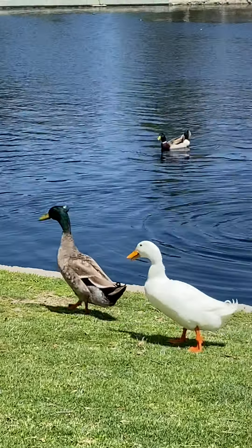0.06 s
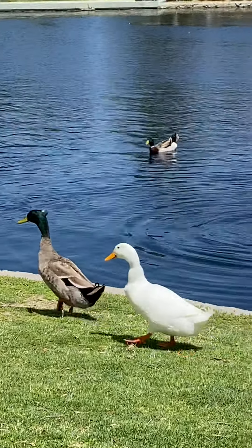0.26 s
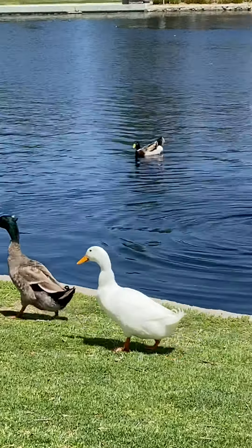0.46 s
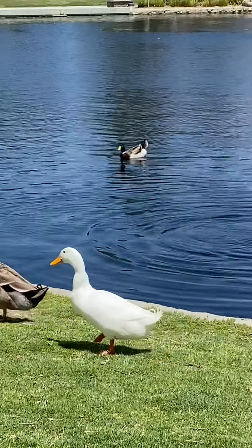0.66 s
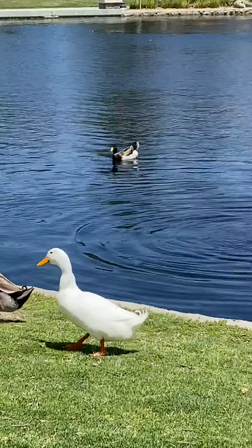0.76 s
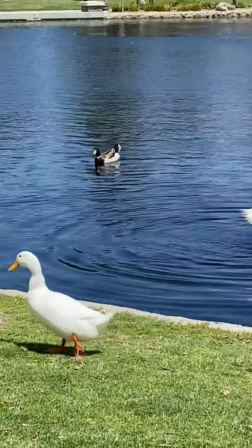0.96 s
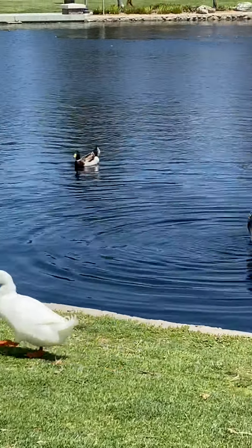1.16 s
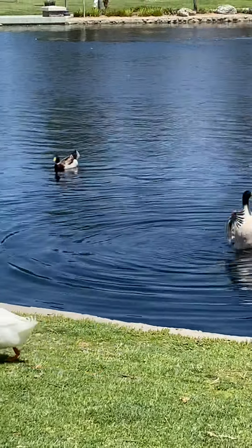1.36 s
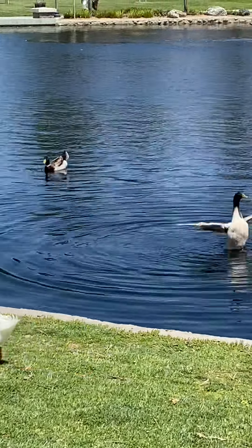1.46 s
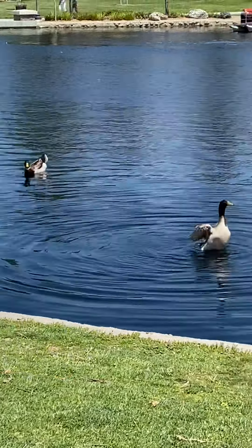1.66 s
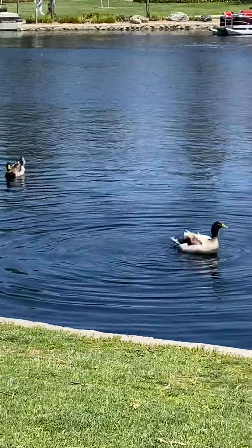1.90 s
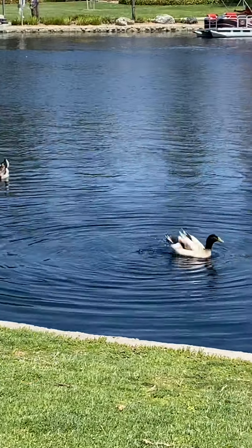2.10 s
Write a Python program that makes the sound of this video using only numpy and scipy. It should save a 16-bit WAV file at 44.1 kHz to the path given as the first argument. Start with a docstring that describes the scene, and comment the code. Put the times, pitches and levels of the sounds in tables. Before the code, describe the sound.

Short raspy duck quacks come scattered over a steady soft park hiss; around one second another duck starts beating its wings, growing to wet slaps and rattling feathers, while breeze rumbles on a close stereo microphone.

```python
"""Ducks on a breezy pond

A drake's short raspy quacks are pulse trains ringing throat resonances, with one faint echo.
Another duck beats its wings on the water: swells of noise, feather rattle and slaps, snaps, churned wash.
Behind them lies a steady park hiss. These pass through two close ports with level and phase offsets.
A light breeze rumbles, buffets and knocks on the ports directly."""
import sys
import numpy as np
from scipy import signal
from scipy.fft import rfft, irfft, next_fast_len
from scipy.io import wavfile
from scipy.ndimage import uniform_filter1d

SR = 44100
rng = np.random.default_rng(int(sys.argv[2]) if len(sys.argv) > 2 else 0)


def master(y):
    """Save y as 16-bit WAV."""
    cut = np.clip(np.atleast_2d(y).T, -1, 1)
    pcm = np.round(cut * 32767)  # scale
    wavfile.write(sys.argv[1], SR, pcm.astype(np.int16))


N = 94153
SIZE = next_fast_len(N + 4096)  # FFT length, padded so filter tails do not wrap

# quacks: [start t/s, length/s, level/dB, mid-call throat f/Hz, strong pulses per s,
#   mid-call tilt/dB per octave, tilt change start to end/dB per octave,
#   side resonances/dB, throat glide start to end/share]
QUACKS = [(0.029, 0.089, -46.5, 1877, 96, -2, -14, -0.5, 0.096),
          (0.529, 0.038, -51.5, 2217, 70, -16, 0, -7, .03),
          (0.556, 0.077, -49.5, 1806, 94, -6, 15, 2.5, 0.11),
          (0.77, 0.1, -50, 1840, 74, -2, -20, 2, -0.1555), (1.279, 0.07, -49, 1820, 67, -14, -20, 1, -.1),
          (1.493, 0.084, -45, 1853, 77, 4.5, 6, -1.5, .14), (1.783, 0.03, -51, 1750, 70, -3, -13, 2, -.05),
          (1.866, 0.054, -56, 1810, 68, -2, 13, -7, 0.06), (1.928, 0.088, -52.5, 1770, 73, -14, 18, 0, .1)]
# throat resonances: [f/share of the throat centre, width of one pass/Hz, relative level/dB]
THROAT = [(.82, 163, -1), (1.0, 95, 4), (1.2, 105, 1.5), (1.45, 114, -7), (2.9, 510, -15)]
# wing beats: [peak t/s, relative whoosh level/dB, relative rattle level/dB, relative slap level/dB,
#   breadth of the rise/s]
BEATS = [(0.987, -55, -73, -67, 0.028), (1.064, -57, -83, -71, 0.014), (1.163, -49, -79, -67, 0.033),
         (1.246, -54, -79, -71, 0.067), (1.34, -55, -74, -66, 0.027), (1.447, -47, -59, -55, 0.032),
         (1.675, -53, -60, -69, 0.023), (1.763, -45.5, -50.5, -50.5, 0.036),
         (1.864, -47, -58.5, -54.5, 0.031), (1.951, -62, -77, -75, 0.038)]
# dull whoosh of pushed air: [f/Hz, relative level/dB per Hz]
WHOOSH_COLOUR = [(150, -26), (350, 7), (700, 2), (1100, 2), (2200, -43), (8000, -68)]
# brighter swish that follows it: [f/Hz, relative level/dB per Hz]
SWISH_COLOUR = [(400, -1.5), (900, 1), (1400, 3), (2200, -15), (3500, -12), (9000, -45)]
# snaps of water and feathers: [t/s, peak level/dB, f/Hz]
DROPS = [(1.2114, -40.5, 3200), (1.447, -43, 1370), (1.4547, -38, 1400), (1.766, -33, 1300),
         (1.87, -35.5, 1530)]
# churned water round the flapping bird: [t/s, level/dB]
CHURN_LEVEL = [(0, -57), (.3, -58), (.8, -64.5), (1.15, -61), (1.5, -56), (1.9, -54), (2.13, -57.5)]
# colour of the churn: [f/Hz, relative level/dB per Hz]
CHURN_COLOUR = [(150, -4.5), (400, -4), (800, 3.5), (1600, 2), (3000, 0), (6000, -38)]
# breeze, gust by gust: [t/s, rumble level/dB, relative buffeting level/dB,
#   relative level of the part differing between ports/dB]
BREEZE = [
    [(0.0, -45, -73, -56), (0.048, -52, -82, -70), (0.09, -64, -44, -53), (0.158, -43, -51.5, -68),
     (0.188, -56, -62, -55), (0.262, -49.5, -53.5, -74), (0.49, -61, -60.5, -63.5),
     (0.596, -48.5, -61, -77), (0.676, -54.5, -53, -66), (0.704, -46, -74, -72), (0.73, -59, -49, -65),
     (0.788, -46.5, -62, -60), (0.858, -65, -52.5, -75), (0.886, -44, -79, -54), (0.98, -50, -50, -53)],
    [(0.99, -60, -57, -62), (1.014, -51.5, -52, -62), (1.046, -43, -44, -62), (1.094, -46.5, -51.5, -63),
     (1.264, -40, -49.5, -61), (1.284, -51, -62, -68), (1.308, -40.5, -48, -52), (1.344, -42, -55.5, -59),
     (1.4, -45, -46, -47), (1.472, -39, -50.5, -57), (1.496, -63, -48.5, -65), (1.516, -45, -48.5, -61),
     (1.58, -59, -52.5, -70), (1.6, -45, -56, -71), (1.652, -43, -46, -60)],
    [(1.664, -46, -33.5, -54), (1.682, -30, -40, -57), (1.706, -48.5, -44.5, -63), (1.734, -39, -44.5, -61),
     (1.768, -36.5, -53, -64), (1.804, -50.5, -51.5, -62), (1.858, -53, -45.5, -67),
     (1.914, -38.5, -50, -59), (1.936, -50, -66, -60), (1.964, -31, -54.5, -51), (1.986, -50, -54, -54),
     (2.02, -50, -58.5, -44), (2.04, -64, -55, -49), (2.106, -51, -53, -56), (2.13, -63, -42, -66)],
]
# colours of rumble, buffeting and the differing part: [f/Hz, relative level/dB per Hz]
RUMBLE_COLOUR = [(20, -45), (32, -12), (50, 1), (80, 4.5), (120, -7.5), (170, -17.5), (300, -59),
                 (3000, -100)]
BUFFET_COLOUR = [(60, -38), (110, 1.5), (160, 0), (240, -2.5), (330, -15.5), (500, -39), (1000, -59),
                 (5000, -100)]
APART_COLOUR = [(30, -30), (60, -12), (100, -3), (150, 0), (250, -4), (400, -15), (1000, -45), (5000, -100)]
# sudden knocks of air on the ports: [t/s, level/dB, f midway through the sag/Hz, ring/s]
KNOCKS = [(1.036, -38.5, 165, 0.031), (1.6618, -34, 197, 0.022), (1.664, -35, 82.2, .034),
          (1.906, -39.5, 100, .02)]
# far hiss of park and water: [f/Hz, relative level/dB per Hz]
PARK_COLOUR = [(20, -60), (40, -30), (100, 1.5), (300, 1.5), (500, -1.5), (1000, -1), (1500, -4),
               (2000, -6.5), (3000, -9), (4000, -11), (5500, -11), (7000, -13.5), (9500, -15),
               (12000, -22.5), (16000, -26.5)]
# share of the hiss reaching each port separately: [f/Hz, level/dB]
DIFFUSE = [(60, -22), (300, -8), (700, -6), (1500, -7), (2500, -9), (3500, -13), (6000, -9), (16000, -10)]
# between the ports: [f/Hz, left minus right level/dB]
PORT_BALANCE = [(60, 0), (200, -1), (330, -3), (500, -5), (770, -7), (1170, -7), (1650, -3), (2000, 0),
                (2500, 2), (3100, 0), (15000, 0)]
# between the ports: [f/Hz, lead of the left phase/rad]
PORT_PHASE = [(20, 0), (1120, -.5), (2000, 0), (4200, .2), (5200, .5), (6000, 1.7), (6900, 2.9),
              (8000, 3.5), (9900, 5.9), (11600, 6.7), (12600, 9.0), (14500, 9.8), (16000, 12)]

# quacks
PULSE_JITTER, HALF_PULSE_DB = 0.1, -5.5  # spread as share of the gap; weak against strong pulse
BREATH_SHARE, BREATH_S = 0.6, 0.006  # strength and decay of the puff after each pulse
COLOUR_SWING_DB = 2.5  # random resonance level, pulse by pulse
BILL_OPEN_DB = 11  # brightening from either end to mid-call, dB per octave
QUACK_RISE, QUACK_FALL, QUACK_START = 0.45, 0.25, 0.18  # shares of length, gain at the start
ECHO_S, ECHO_DB = 0.003105, -13.5
# wings
BEAT_FALL_SHARE = 0.68  # breadth of the fall against the rise
BRIGHT_LAG_S, BRIGHT_DB = 0.002, -2  # swish lags and whoosh leads by this time
RATTLE_PER_S, RATTLE_LEAD_S, RATTLE_S = 203, 0.012, 0.014  # touches, lead on the peak, half breadth
RATTLE_LOW_HZ, RATTLE_HIGH_HZ = 3600, 6400
PUFF_S, RATTLE_ROUGH, RATTLE_DB = 0.0006, 0.5, 21.5
SLAP_HZ, SLAP_WIDTH_HZ, SLAP_DB, SLAP_LAG_S = 1400, 700, 42, 0.005  # width of one pass
# drops, knocks, park
DROP_WIDTH_SHARE = 0.5  # width of one pass as share of the pitch
KNOCK_SAG, KNOCK_SNAP_DB = 0.49, -12  # pitch slides from 1 + sag towards 1 - sag
PARK_DB, PARK_WAVER_DB = -53, 0.3
CUTOFF_HZ = 16000


def amp(db):
    """dB to gain."""
    return 10 ** (np.asarray(db) / 20)


def rms_one(x):
    """Scale to unit rms."""
    return x / np.sqrt(np.mean(x ** 2) + 1e-20)


def at_hz(points, size):
    """Read a table at every FFT bin along a log frequency axis."""
    hz, value = np.transpose(points)
    bin_hz = np.arange(size // 2 + 1) * SR / size
    return np.interp(np.log(bin_hz + 1), np.log(hz), value)


def shaped(x, response):
    """Filter by a response per FFT bin."""
    return irfft(rfft(x, SIZE) * response, SIZE)[..., :N]


def noise(colour, channels=1):
    """Coloured noise, rms 1."""
    white = rng.standard_normal((channels, N))
    return rms_one(shaped(white, amp(at_hz(colour, SIZE))))


def drift(rate_hz):
    """Smooth random wander, rms 1: noise through two equal low-pass poles."""
    r = np.exp(-2 * np.pi * rate_hz / SR)
    wander = signal.lfilter([1], [1, -2 * r, r * r], rng.standard_normal(N + SR))
    return rms_one(wander[SR:])  # drop the settling second


def resonate(x, hz, width_hz):
    """Two-pole resonance, gain 1 on top."""
    r = np.exp(-np.pi * width_hz / SR)
    poles = [1, -2 * r * np.cos(2 * np.pi * hz / SR), r * r]
    return signal.lfilter([(1 - r * r) / 2, 0, (r * r - 1) / 2], poles, x)


def pulses(size, per_s, jitter):
    """Sample indices of pulses with randomly varied gaps."""
    gaps = SR / per_s * (1 + jitter * np.clip(rng.standard_normal(64), -2, 2))
    at = np.cumsum(gaps)
    return at[at < size].astype(int)


def quack_voice(size, hz, rate, sides_db, tilt_db):
    """Strong-weak pulses, each with a puff of breath, ring the throat in ever-varied colours."""
    breath = rng.standard_normal(SR // 4)[:size]
    colours = amp(COLOUR_SWING_DB * rng.standard_normal((len(THROAT), 64)))
    at = pulses(size, 2 * rate, PULSE_JITTER)
    strong_weak = amp(HALF_PULSE_DB * (np.arange(len(at)) % 2))
    r = np.exp(-1 / (BREATH_S * SR))
    voice = np.zeros(size)
    for k, (share, width_hz, level_db) in enumerate(THROAT):
        clicks = np.full(size, 1e-12)
        clicks[at] = colours[k, :len(at)] * strong_weak
        puff = np.sqrt(1 - r * r) * signal.lfilter([1], [1, -r], clicks) * breath
        source = clicks + BREATH_SHARE * puff
        ring = resonate(resonate(source, hz * share, width_hz), hz * share, 3 * width_hz)
        side_db = sides_db * (k != 1)  # every resonance but the central one
        gain = amp(level_db + side_db + tilt_db * np.log2(min(share, 1.4)))
        voice += (-1) ** k * gain * ring  # alternate signs
    return voice


def quacks():
    """Each call brightens towards its middle, glides by time-warping and is levelled, then echoed."""
    out = np.zeros(N + SR)
    for start, length, db, hz, rate, bright_db, slide_db, sides_db, glide in QUACKS:
        size = int(length * SR)
        u = np.arange(size) / size
        tilt_db = bright_db + slide_db * (u - 0.5) + BILL_OPEN_DB * (np.sin(np.pi * u) - 1)
        voice = quack_voice(size, hz, rate, sides_db, tilt_db)
        warped = size * (u + glide * u * (u - 1) / 2)  # pulses and throat glide together
        voice = np.interp(warped, np.arange(size), voice)
        # even out the loudness before drawing the call's envelope
        voice = voice / np.sqrt(uniform_filter1d(voice ** 2, size=700) + 0.062 * np.mean(voice ** 2))
        envelope = np.interp(u, [0, QUACK_RISE, 1 - QUACK_FALL, 1], [QUACK_START, 1, 0.9, 0])
        out[int(start * SR):][:size] += amp(db) * voice * envelope
    lag = int(ECHO_S * SR)
    out[lag:] += amp(ECHO_DB) * out[:-lag]
    return out[:N]


def wing_air(push):
    """Pushed air swells dull then bright, fluttered by the feathers."""
    t = np.arange(N) / SR
    early = np.interp(t + BRIGHT_LAG_S, t, push)
    late = np.interp(t - BRIGHT_LAG_S, t, push)
    air = early * noise(WHOOSH_COLOUR)[0] + amp(BRIGHT_DB) * late * noise(SWISH_COLOUR)[0]
    air *= 1 + 0.5 * np.cos(2 * np.pi * RATTLE_PER_S * t + 2.0 * drift(26))
    return air * amp(3.0 * drift(350) - 3.0)


def feather_rattle(touches):
    """Clicks with short noisy tails through a treble band make wet feathers rattle."""
    tails = signal.lfilter([1], [1, -np.exp(-1 / (PUFF_S * SR))], touches)
    puffs = tails * RATTLE_ROUGH * rng.standard_normal(N) + 2.0 * touches
    band = signal.butter(5, [RATTLE_LOW_HZ, RATTLE_HIGH_HZ], "band", fs=SR, output="sos")
    return amp(RATTLE_DB) * signal.sosfilt(band, puffs)


def wing_slaps(touches):
    """Each feather touch also rings a broad resonance, a little later, as a dull slap."""
    delayed = np.roll(touches, int(SLAP_LAG_S * SR))[:N]
    ring = resonate(delayed, SLAP_HZ, SLAP_WIDTH_HZ)
    return amp(SLAP_DB) * resonate(ring, SLAP_HZ, SLAP_WIDTH_HZ)


def wings():
    """Each beat is a swell of pushed air, with a burst of feather touches centred just before its top."""
    t, push = np.arange(N) / SR, np.zeros(N)
    touches = np.full((2, N + SR), 1e-12)  # rows: rattle, slap
    for s, whoosh_db, rattle_db, slap_db, breadth in BEATS:
        width = np.where(t < s, breadth, breadth * BEAT_FALL_SHARE)
        push += amp(whoosh_db) * np.exp(-((t - s) / width) ** 2)
        at = pulses(SR // 10, RATTLE_PER_S, jitter=0.022)
        burst = np.exp(-((at / SR - 0.05) / RATTLE_S) ** 4)
        first = int((s - RATTLE_LEAD_S - 0.05) * SR)
        touches[:, at + first] += amp([[rattle_db], [slap_db]]) * burst
    return wing_air(push) + feather_rattle(touches[0, :N]) + wing_slaps(touches[1])


def drops():
    """Short ticks, each a click ringing a broad resonance of its own."""
    out, click = np.zeros(N + SR), np.eye(1, 600)[0]
    for s, db, hz in DROPS:
        width_hz = DROP_WIDTH_SHARE * hz
        tick = resonate(resonate(click, hz, width_hz), hz, width_hz)
        out[int(s * SR):][:len(tick)] += amp(db) * tick / np.abs(tick).max()
    return out[:N]


def churn():
    """A soft noise wash of churned water, ebbing and then growing with a slight waver."""
    s, db = np.transpose(CHURN_LEVEL)
    level_db = np.interp(np.arange(N) / SR, s, db) + 0.69 * drift(60)
    return amp(level_db) * noise(CHURN_COLOUR)[0]


def breeze():
    """Lumpy low noise common to both ports, plus a part in opposite sign that pushes them apart."""
    s, *columns = np.concatenate(BREEZE).T
    rumble_db, buffet_db, apart_db = [np.interp(np.arange(N) / SR, s, c) for c in columns]
    rumble = amp(rumble_db) * noise(RUMBLE_COLOUR)
    buffeting = amp(buffet_db - 0.5 + 2.0 * drift(24.5)) * noise(BUFFET_COLOUR)
    apart = amp(apart_db + 2.8 * drift(10.4)) * noise(APART_COLOUR)
    return rumble + buffeting + apart * [[1], [-1]]


def knocks():
    """A sharp push of air rings low, sagging in pitch, with a shorter snap an octave up."""
    out, t = np.zeros(N + SR), np.arange(SR // 8) / SR
    for s, db, hz, ring_s in KNOCKS:
        pitch = 1 + KNOCK_SAG * (2 * np.exp(-t / ring_s) - 1)
        phase = 2 * np.pi * hz * np.cumsum(pitch) / SR
        thump = np.exp(-(t / ring_s) ** 4) * np.sin(phase)
        snap = amp(KNOCK_SNAP_DB) * np.exp(-5.0 * t / ring_s) * np.sin(2 * phase)
        out[int(s * SR):][:len(t)] += amp(db) * (thump + snap)
    return out[:N]


def park():
    """Far hiss with a faint waver: one shared noise plus a separate filtered noise for each port."""
    hiss = amp(PARK_DB + PARK_WAVER_DB * drift(8)) * noise(PARK_COLOUR, channels=3)
    diffuse = shaped(hiss[1:], amp(at_hz(DIFFUSE, SIZE)))
    return hiss[0] + diffuse


def ports(x):
    """Two close ports hear the sound with a level and phase difference, split evenly between them."""
    half = amp(at_hz(PORT_BALANCE, SIZE) / 2) * np.exp(0.5j * at_hz(PORT_PHASE, SIZE))
    return shaped(x, np.array([half, 1 / half]))


def scene():
    """Birds and park pass through the ports; breeze and knocks act on them directly."""
    pond = quacks() + wings() + drops() + churn() + park()
    return ports(pond) + breeze() + knocks()


def record(dry):
    """A steep low-pass cuts the top."""
    return signal.sosfilt(signal.cheby2(22, 70, CUTOFF_HZ, fs=SR, output="sos"), dry)


dry = scene()
out = record(dry)
master(out)
```